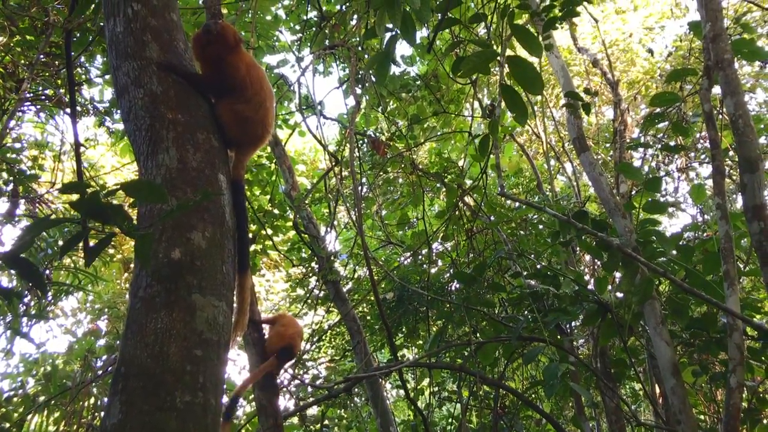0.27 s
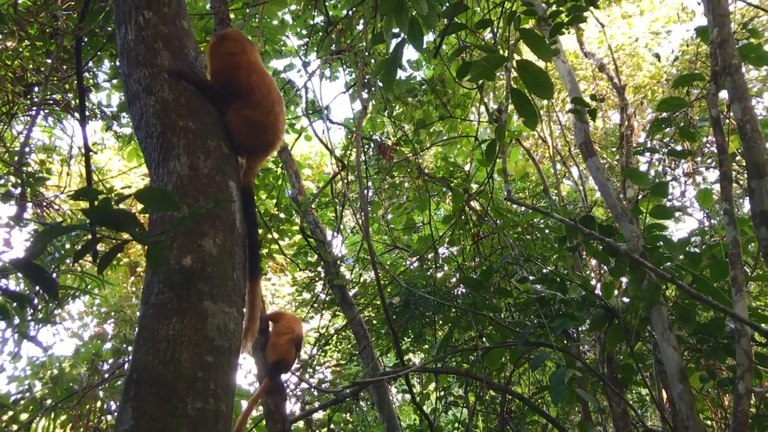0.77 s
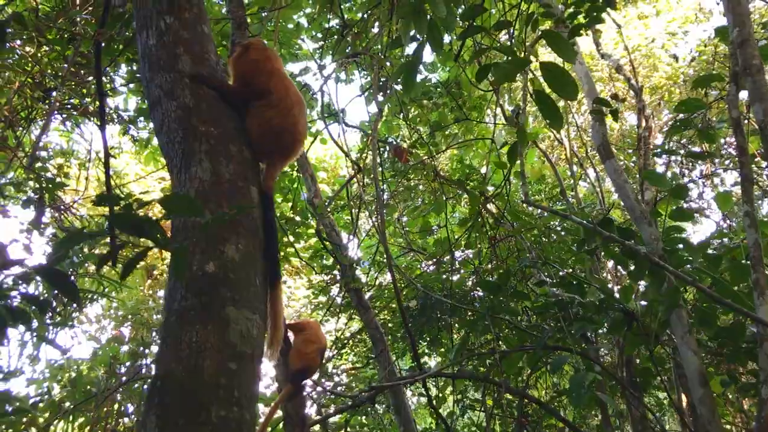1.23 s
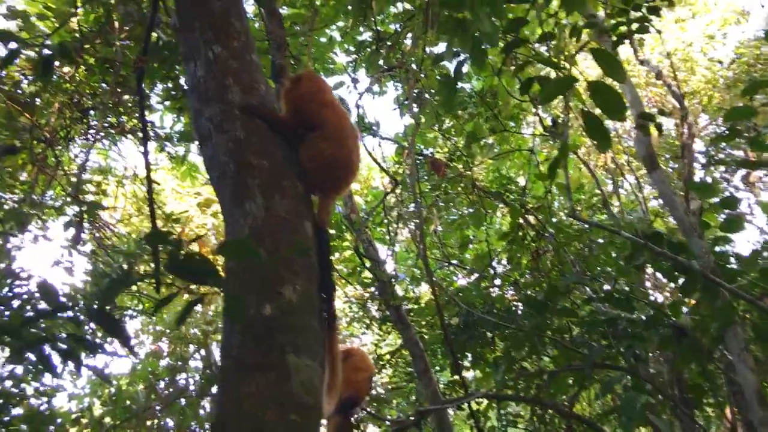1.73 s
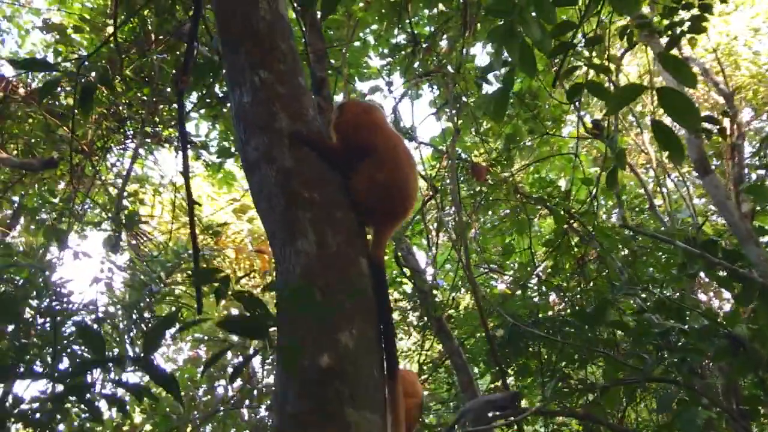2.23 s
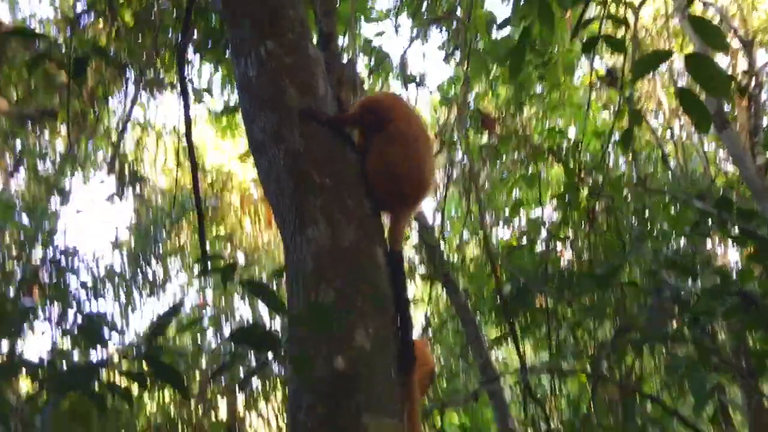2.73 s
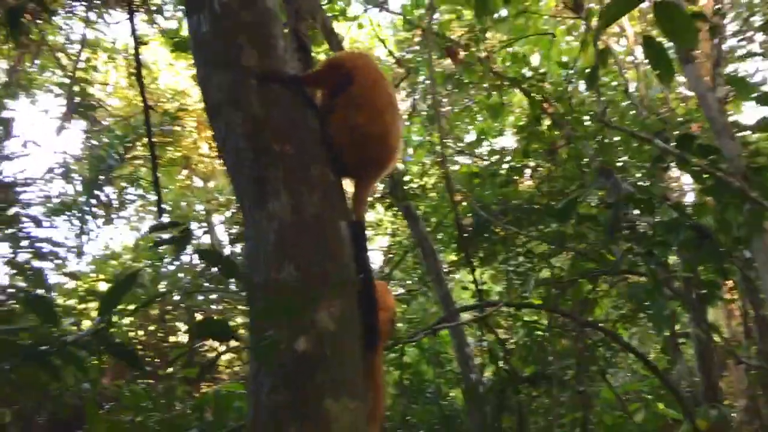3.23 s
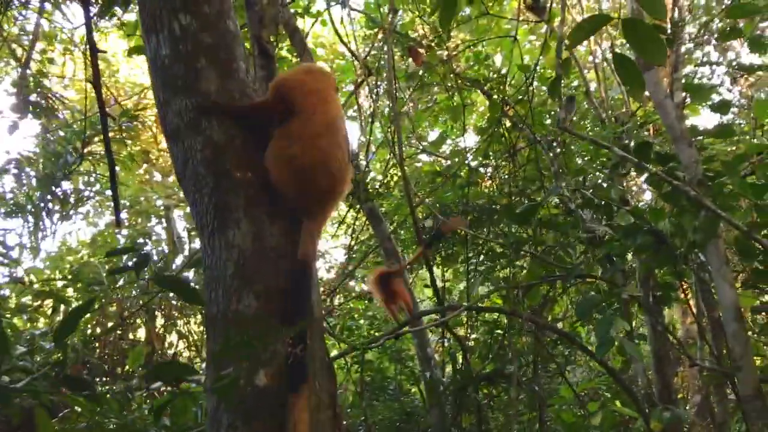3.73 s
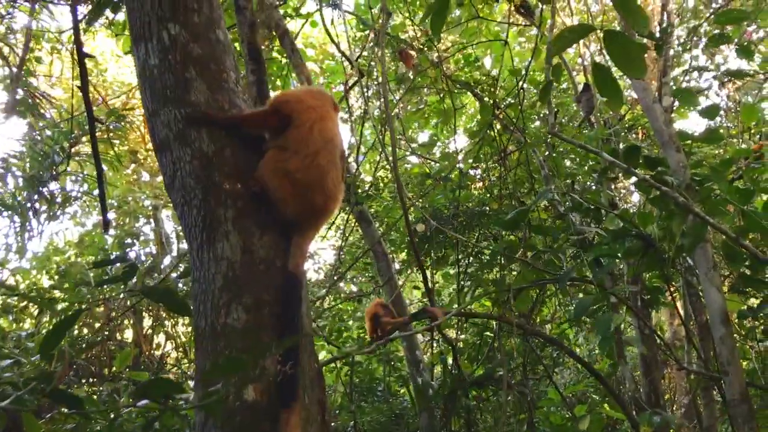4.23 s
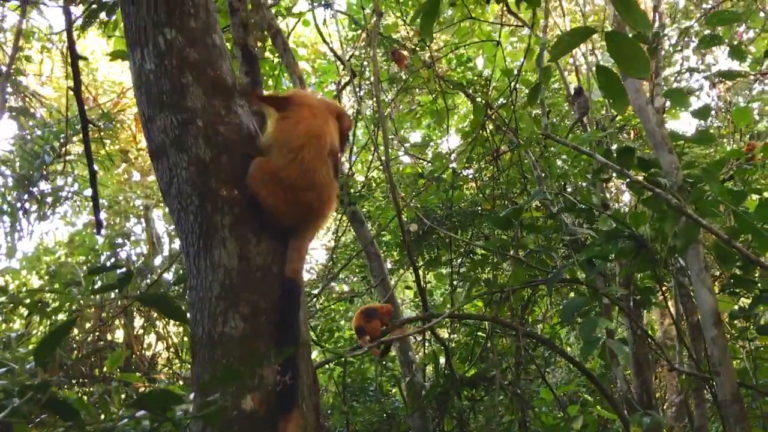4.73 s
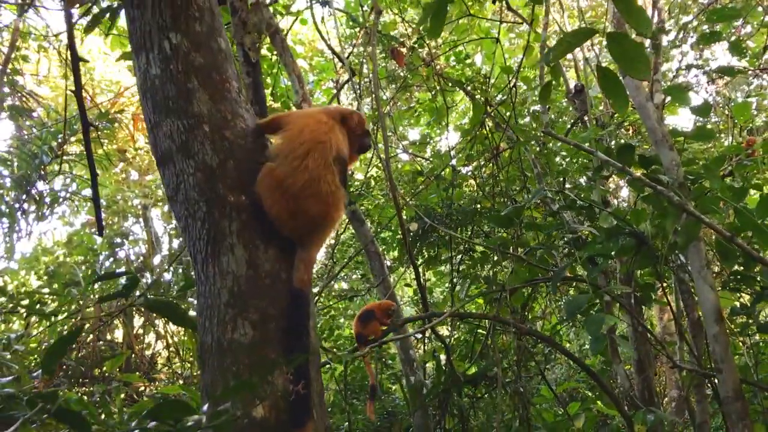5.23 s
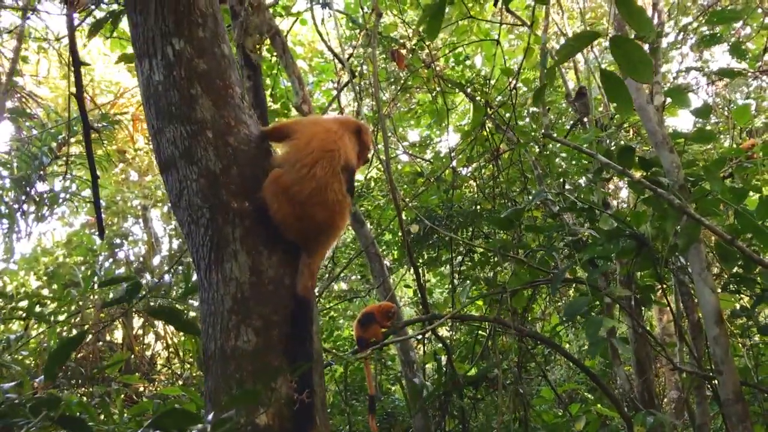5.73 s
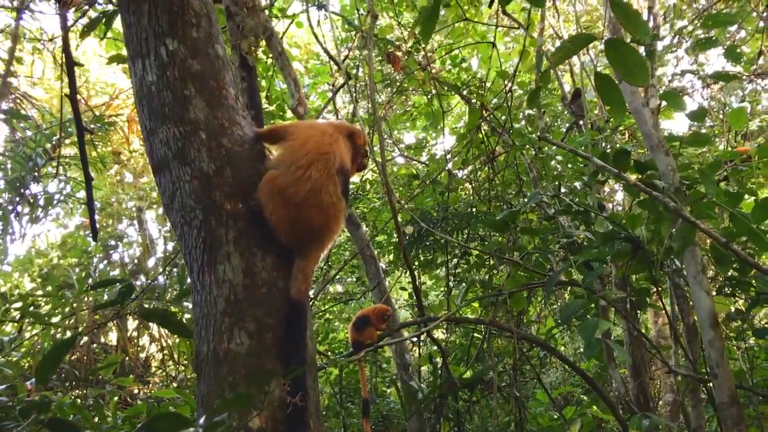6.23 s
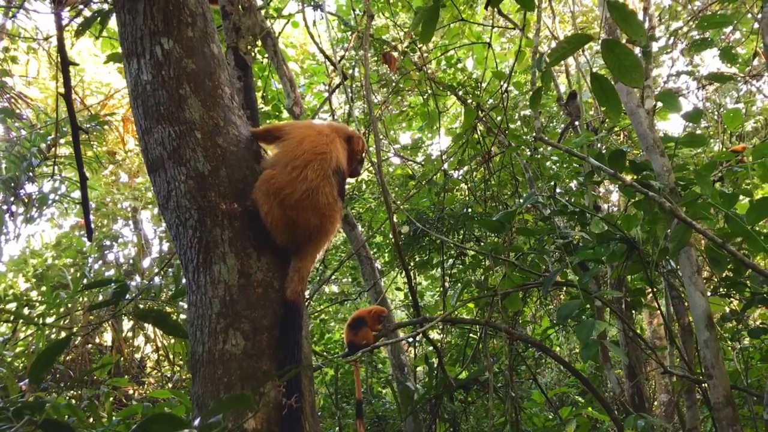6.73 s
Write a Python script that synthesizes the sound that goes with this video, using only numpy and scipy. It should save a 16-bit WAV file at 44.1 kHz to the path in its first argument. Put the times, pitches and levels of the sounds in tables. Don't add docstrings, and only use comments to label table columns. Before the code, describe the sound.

Outdoors in dense forest, a hand-held microphone a few metres from small monkeys. A distant harsh scream fades, then a quick bright trill and thin sagging whistles. Around two seconds chirps lead into two torn, piercing screams, answered by a farther rough scream. A quiet stretch follows with small twig snaps, then a run of clear high whistles. Leaf and insect hiss, a faint drone and light wind rumble lie underneath.

```python
import sys
import numpy as np
from scipy import signal
from scipy.fft import rfft, irfft, next_fast_len
from scipy.io import wavfile
from scipy.ndimage import uniform_filter1d, minimum_filter1d

SR = 44100
rng = np.random.default_rng(int(sys.argv[2]) if len(sys.argv) > 2 else 0)


def linear_from_db(decibels):
    return 10 ** (np.asarray(decibels, float) / 20)


def put_to_file(sound):
    columns = np.atleast_2d(sound).T
    safe = np.clip(columns, -1, 1)
    whole_steps = np.round(safe * 32767)
    wavfile.write(sys.argv[1], SR, whole_steps.astype(np.int16))


N = 307801

# (start [s], length [s], first pitch [Hz], last pitch [Hz], level [dB])
LEAD_IN = (.246, .05, 10200, 8250, -33)
STEADY_DB = 2.04


def level(x, db):
    return x * linear_from_db(db) / np.sqrt(np.mean(x ** 2))


def shaped(x, table):
    hz, db = np.transpose(table)
    size = next_fast_len(x.shape[-1])
    f = np.maximum(np.arange(size // 2 + 1) * SR / size, 1)
    gain = linear_from_db(np.interp(np.log(f), np.log(hz), db))
    return irfft(rfft(x, size) * gain, size)[..., :x.shape[-1]]


def band(hz, width, db=0):
    return [(max(hz - 3 * width, 5), db - 50), (max(hz - width / 2, 6), db - 0.5), (hz, db),
            (hz + width / 2, db - 1), (hz + 3 * width, db - 64.0)]


def walk(rate, size=N):
    k = max(int(SR / rate), 1)
    noise = rng.standard_normal(size + 2 * k)
    smooth = uniform_filter1d(uniform_filter1d(noise, k), k)[k:k + size]
    return smooth * np.sqrt(1.5 * k)


def add(out, x, start, pan_db):
    i = int(start * SR)
    x = x[:N - i]
    out[:, i:i + len(x)] += x * linear_from_db(np.array([[pan_db], [-pan_db]]) / 2)


def glide(row, bend, attack_s, onset_db, fade_db, chaos):
    s, length, first_hz, last_hz, db = row
    u = np.linspace(0, 1, 24)
    slide = u ** bend if bend > 1 else 1 - (1 - u) ** (1 / bend)
    pitch_hz = first_hz + (last_hz - first_hz) * slide
    level_db = db + onset_db * np.clip(1 - u * length / attack_s, 0, 1) + fade_db * (u - .5)
    return np.transpose([s + u * length, pitch_hz, level_db, chaos + 0 * u])


def voice(rows, overtone_db, spread=.16, tear_hz=1500, wobble=0.00641, flutter_db=3.5, rasp_db=4.5, throat=None):
    # (frequency [Hz], level [dB per Hz])
    rasp_colour = [(530, -73), (900, -43), (1470, -26.5), (1880, -26), (2220, -23), (3300, -25.5),
                   (4410, -24.5), (6330, -5.5), (7860, -1), (10500, -2.5), (12400, -13.5), (14900, -1.5),
                   (16000, -21)]
    # (frequency [Hz], gain [dB])
    short_throat = [(1000, -45), (3400, -26), (4200, -7), (5200, -1.5), (16000, -0.5)]
    s, *columns = np.transpose(rows)
    t = np.arange(s[0], s[-1], 1 / SR)
    hz, db, chaos = (uniform_filter1d(np.interp(t, s, c), size=160, mode="nearest") for c in columns)
    chaos = np.clip(chaos, 0, 1)
    shake = spread * chaos * walk(tear_hz, len(t)) + wobble * walk(145, len(t))
    hz = hz * np.clip(1 + shake, .6, 1.35)
    phase = 2 * np.pi * np.cumsum(hz) / SR
    audible = np.clip((SR / 2 - 2 * hz) / 2000, 0, 1)
    tone = np.sqrt(2) * (np.sin(phase) + linear_from_db(overtone_db) * audible * np.sin(2 * phase))
    tone = tone * linear_from_db(flutter_db * walk(166, len(t)) + 1.6 * chaos * walk(1300, len(t)))
    rasp = level(shaped(rng.standard_normal(len(t)), rasp_colour), rasp_db)
    rasp = rasp * linear_from_db(0.22 * walk(600, len(t)))
    edge = np.clip(np.minimum(t - s[0], s[-1] - t) / 0.001, 0, 1)
    sung = np.sqrt(1 - 0.71 * chaos) * shaped(tone, throat or short_throat)
    return edge * linear_from_db(db) * (sung + chaos ** 2 * rasp)


def trees(x, direct_db, t60, wet_db, late_t60, late_db, alike=0.67):
    t = np.arange(SR * 3 // 4) / SR
    quick = linear_from_db(wet_db - 60 * t / t60) / np.sqrt(t60)
    late = linear_from_db(late_db - 60 * t / late_t60) / np.sqrt(late_t60)
    tail = (quick + late) * np.clip(t / 0.0017, 0, 1) * np.sqrt(np.log(1e6) / SR)
    both, each = rng.standard_normal(len(t)), rng.standard_normal((2, len(t)))
    scatter = np.sqrt(alike) * both + np.sqrt(1 - alike) * each
    echo = shaped(scatter * tail, [(1500, -8), (4500, 0), (9000, 0), (16000, 2)])
    return linear_from_db(direct_db) * x + signal.oaconvolve(x, echo, axes=1)[:, :N]


def far_monkeys():
    # (time [s], pitch [Hz], level [dB], chaos [0-1])
    screams = [
        [(0, 6750, -40, 0.86), (.06, 6660, -41, 0.62), (.13, 6740, -50.5, 0.25), (.20, 6270, -60, 0.3),
         (.25, 6140, -51, .09)],
        [(3.50, 6550, -43.5, 0.87), (3.62, 6670, -48, .83), (3.73, 6580, -46, 0.76), (3.82, 6750, -43.5, 1),
         (3.98, 6930, -42, .82), (4.08, 6680, -44, 0.81), (4.125, 6200, -41.5, 0.262), (4.19, 6150, -52, .7),
         (4.32, 6080, -89, 0.91)],
    ]
    # (start [s], length [s], first pitch [Hz], last pitch [Hz], level [dB])
    sweeps = [
        (4.63, .13, 10500, 11600, -69.5),
        (5.27, .37, 5100, 7900, -67),
        (5.26, .34, 10100, 15000, -65),
    ]
    far = np.zeros((2, N))
    for row in sweeps:
        rows = glide(row, bend=0.7, attack_s=0.018, onset_db=3, fade_db=0, chaos=0.363)
        add(far, voice(rows, overtone_db=-29), row[0], pan_db=4.5)
    for rows in screams:
        add(far, voice(rows, overtone_db=-2), rows[0][0], pan_db=0.4)
    far = shaped(far, [(1000, 2.0), (4000, 3), (6000, -0.5), (13500, -3.0), (14600, -18), (15800, -28)])
    return trees(far, direct_db=-5.5, t60=0.35, wet_db=-4.0, late_t60=0.7, late_db=-11, alike=0.2)


def pair(table, db):
    # (frequency [Hz], side minus mid [dB])
    side_colour = [(60, 6), (110, -12.5), (200, -1.5), (380, -3.5), (700, -5.5), (1290, -5.5), (2380, -2.5),
                   (4400, -3), (8120, -1.5), (15000, 1)]
    mid, side = shaped(rng.standard_normal((2, N)), table)
    side = shaped(side, side_colour)
    return np.array([mid + side, mid - side]) * linear_from_db(db) / np.std(mid)


def forest():
    # (frequency [Hz], level [dB per Hz])
    wind_colour = [(11, -39), (18, 5), (50, -6), (67, -8.5), (130, -25.5), (151, -24.5), (210, -19),
                   (247, -23.5), (301, -22.5), (483, -29.5), (900, -35), (1170, -51.5), (1980, -120)]
    # (time [s], level [dB])
    gusts = [(0, 3), (2.2, 1), (2.45, -5.5), (3.2, 0.5), (4.7, 1.4), (6.1, -0.5), (6.39, 1), (6.42, 8),
             (6.46, -2), (6.98, 0.5)]
    # (frequency [Hz], level [dB per Hz])
    leaf_colour = [(530, -7.5), (900, -10.5), (1000, -3), (1260, -4.5), (1540, -7), (2650, -10),
                   (3290, -10), (4230, -11), (5060, 1), (6830, -9.5), (15800, -16.5)]
    # (frequency [Hz], width [Hz], level [dB])
    drone_modes = [(210, 16, -3), (300.5, 16.4, -8)]
    # (time [s], nearness [0-1])
    passing = [(0, 0.3), (2.4, 0.14), (2.85, 0.95), (3.4, 0.73), (3.8, 0.93), (4.4, 0.58), (4.9, 0.19),
               (6.98, 0.32)]
    t = np.arange(N) / SR
    nearness = np.interp(t, *np.transpose(passing))

    wind = pair(wind_colour, -51.5)
    rumble = shaped(wind, [(110, 0.5), (200, -13)])
    gust = linear_from_db(np.interp(t, *np.transpose(gusts)))
    lean = linear_from_db(np.array([[2.5], [-2.5]]))
    wind = wind + rumble * (gust * lean - 1)

    leaves = pair(leaf_colour, -66) * linear_from_db(6 * (nearness - 0.56) + .5 * walk(21))

    drone = sum(shaped(rng.standard_normal(N), band(*mode)) for mode in drone_modes)
    drone_db, drone_range_db = -51.5, 23
    drone = level(drone, -11.5) * linear_from_db(drone_db + drone_range_db * (nearness - 1))
    return wind + leaves + drone * linear_from_db(np.array([[-1.5], [1.5]]))


def trill(chaos=0.035):
    # (top time [s], top pitch [Hz], bottom pitch [Hz], level of the flick and at the start of the fall
    # [dB], level the fall settles to near its bottom [dB])
    strokes = [
        (0.308, 14020, 6590, -29, -30.5),
        (.351, 8450, 5510, -30.5, -27),
        (.397, 9670, 5170, -29, -32),
        (.444, 6380, 5126, -34, -27.5),
    ]
    flick_s, top_s, fall_s = .013, 0.0035, .03
    rows = [glide(LEAD_IN, bend=.33, attack_s=0.017, onset_db=-11, fade_db=5.0, chaos=chaos)]
    for s, top_hz, bottom_hz, top_db, bottom_db in strokes:
        last_hz = rows[-1][-1, 1]
        flick = (s - flick_s, flick_s, last_hz, top_hz, top_db)
        fall = (s + top_s, fall_s, top_hz, bottom_hz, bottom_db)
        rows += [glide(flick, bend=.9, attack_s=flick_s, onset_db=-3.5, fade_db=-4, chaos=chaos),
                 glide(fall, bend=0.65, attack_s=0.023, onset_db=top_db - bottom_db, fade_db=0, chaos=chaos)]
    rows = np.vstack(rows)
    rows[:, 0] = np.maximum.accumulate(rows[:, 0])
    return rows


def near_monkeys():
    # (start [s], length [s], first pitch [Hz], last pitch [Hz], level [dB])
    hooks = [(2.084, 0.02, 7500, 9700, -46.5), (2.108, 0.047, 7900, 6170, -35.5),
             (2.152, .044, 6200, 6810, -42), (2.197, .028, 6870, 5810, -32), (2.485, .022, 6490, 5520, -41),
             (2.772, 0.016, 6010, 4050, -38.5), (3.628, .03, 9100, 7000, -40),
             (3.662, .05, 6520, 5630, -45), (6.825, 0.04, 9800, 7100, -65),
             (6.878, .044, 11000, 6950, -58.5), (6.924, .022, 5270, 4060, -56),
             (0.476, .014, 5250, 4450, -48)]
    dives = [
        (2.662, 0.044, 7230, 4310, -33),
        (3.428, .05, 6970, 4500, -30.5),
    ]
    whines = [
        (2.50, .25, 9530, 8900, -41.5),
        (4.13, 0.19, 6930, 6890, -54.5),
    ]
    squeals = [
        (2.272, 0.27, 7250, 7600, -54),
        (2.928, 0.032, 4340, 6020, -48),
        (3.101, .33, 7600, 7440, -47),
    ]
    croaks = [
        (6.385, .11, 1800, 3500, -57),
        (6.915, .065, 1360, 3270, -58.5),
        (2.225, 0.039, 1600, 3600, -57.5),
    ]
    # (time [s], pitch [Hz], level [dB], chaos [0-1])
    screams = [
        [(2.208, 4770, -41.5, 0.03), (2.225, 5120, -37, 0.01), (2.250, 6100, -30, 0.32),
         (2.275, 6200, -31.5, 0.62), (2.31, 6870, -36, 0.92), (2.36, 7900, -38, 0.99), (2.50, 7960, -35, 0.61),
         (2.62, 7440, -37, 0.76), (2.67, 6660, -37.5, .42)],
        [(2.74, 6620, -52, 0.85), (2.85, 6370, -49.5, 0.94), (2.93, 6050, -41, 0.18), (2.97, 6230, -35, 0.62),
         (3.06, 6960, -37, 0.89), (3.16, 7480, -32.5, 0.8), (3.30, 7420, -34, 0.86), (3.40, 7390, -36, 0.81),
         (3.44, 7030, -32.5, .8)],
    ]
    near = np.zeros((2, N))
    add(near, voice(trill(), overtone_db=-7.0, flutter_db=STEADY_DB), LEAD_IN[0], pan_db=2.0)
    for row in hooks:
        rows = glide(row, bend=.7, attack_s=.01, onset_db=-2.5, fade_db=2, chaos=0.016)
        add(near, voice(rows, overtone_db=-12, flutter_db=STEADY_DB), row[0], pan_db=3.5)
    for row in dives:
        rows = glide(row, bend=2.5, attack_s=.02, onset_db=-19, fade_db=-11, chaos=.01)
        add(near, voice(rows, overtone_db=-2.5, flutter_db=STEADY_DB), row[0], pan_db=1.0)
    for row in whines:
        rows = glide(row, bend=.8, attack_s=0.026, onset_db=-11, fade_db=-7, chaos=0.199)
        add(near, voice(rows, overtone_db=-31), row[0], pan_db=-1.0)
    for row in squeals:
        rows = glide(row, bend=0.74, attack_s=.02, onset_db=1, fade_db=3.0, chaos=0.183)
        add(near, voice(rows, overtone_db=9), row[0], pan_db=3.1)
    for rows in screams:
        add(near, voice(rows, overtone_db=-6), rows[0][0], pan_db=3.1)
    open_throat = [(600, 14), (2000, 0.5), (3600, 4.0), (6000, -17)]
    for row in croaks:
        rows = glide(row, bend=1.2, attack_s=0.061, onset_db=-11, fade_db=-3.5, chaos=0.593)
        croak = voice(rows, overtone_db=-8, spread=0.29, rasp_db=-44, throat=open_throat)
        add(near, croak, row[0], pan_db=.3)
    return trees(near, direct_db=-3.5, t60=0.21, wet_db=-4, late_t60=0.58, late_db=-6.5, alike=0.18)


def whistlers():
    # (start [s], length [s], first pitch [Hz], last pitch [Hz], level [dB])
    whistles = [(.65, 0.14, 6730, 6550, -51.5), (0.773, .19, 7250, 7140, -47), (.975, 0.1, 7330, 7150, -55),
                (1.03, 0.2, 6910, 6570, -58), (1.26, .09, 6650, 6200, -56.5),
                (1.725, 0.131, 6680, 6290, -56), (2.055, 0.041, 6640, 6650, -50.5),
                (5.09, 0.12, 6600, 6360, -60), (5.785, .115, 6530, 6540, -44.5),
                (5.90, 0.21, 6530, 6490, -51), (6.095, 0.16, 6960, 6660, -49), (6.25, .15, 7000, 6700, -48),
                (6.405, .165, 7000, 6886, -46), (6.574, 0.14, 6970, 6810, -46.5),
                (6.734, 0.17, 7160, 6834, -45.5), (6.925, 0.068, 7220, 7220, -41.5)]
    # (start [s], length [s], first pitch [Hz], last pitch [Hz], level [dB])
    scoops = [
        (1.235, .06, 5750, 6430, -62),
        (1.72, .05, 6020, 6420, -59),
        (5.76, .045, 5850, 6430, -57.5),
    ]
    out = np.zeros((2, N))
    for row in whistles:
        softer = np.add(row, (0, 0, 1, 0, -6))
        rows = glide(softer, bend=0.608, attack_s=.015, onset_db=-13.5, fade_db=-14, chaos=0)
        add(out, voice(rows, overtone_db=-22.0, wobble=0.01187, flutter_db=3.5), row[0], pan_db=.4)
    for row in scoops:
        rows = glide(row, bend=.55, attack_s=.012, onset_db=-7, fade_db=0.0, chaos=.12)
        add(out, voice(rows, overtone_db=-22, wobble=0.0244, flutter_db=6.0), row[0], pan_db=.4)
    return trees(out, direct_db=-4.0, t60=0.19, wet_db=-1.0, late_t60=0.45, late_db=-4.5, alike=0.26)


def twigs():
    # (time [s], peak level [dB], centre [Hz], width [Hz], left minus right [dB])
    snaps = [(.835, -66, 2050, 1470, 9), (1.109, -66, 3520, 2500, 2), (1.281, -57.5, 3030, 3000, 1),
             (1.674, -57, 3300, 3000, 15), (1.676, -60, 8900, 6000, 5), (4.636, -59, 5040, 5000, -3),
             (4.755, -58.5, 5060, 6000, 0), (5.273, -50.5, 11900, 2500, -8), (5.480, -49, 11100, 6500, -7),
             (5.490, -67, 14000, 2000, 3), (6.310, -62.5, 2700, 1200, -11), (6.518, -59, 1200, 990, 0),
             (6.519, -61, 10600, 1500, 0), (6.565, -55.5, 1960, 1200, -8), (6.567, -58, 9600, 1500, 0),
             (6.710, -58.5, 2950, 1200, 14)]
    # (time [s], peak level [dB], centre [Hz], width [Hz], left minus right [dB])
    rustles = [
        (.984, -63, 10800, 3020, -5),
        (1.119, -66, 11200, 3000, -1),
        (1.27, -59, 10900, 3550, 1),
        (5.262, -64, 3900, 1200, -8),
        (5.257, -59, 10200, 3000, -13),
        (5.736, -64, 10000, 4000, 1),
    ]
    out = np.zeros((2, N))
    t = np.arange(SR // 5) / SR
    for rows, t60 in ((snaps, 0.017), (rustles, 0.11)):
        for s, db, hz, width, pan_db in rows:
            burst = rng.standard_normal(len(t)) * linear_from_db(-60 * t / t60)
            crack = shaped(burst, band(hz, width))
            add(out, linear_from_db(db) * crack / np.abs(crack).max(), s, pan_db)
    return trees(out, direct_db=5.0, t60=0.42, wet_db=4, late_t60=0.22, late_db=-2)


def scene():
    return far_monkeys() + forest() + near_monkeys() + whistlers() + twigs()


def masked(x, near_db=-28, top_db=-25.5, top_hz=14200, count=95):
    f, _, z = signal.stft(x, SR, nperseg=2048)
    power = np.mean(np.abs(z) ** 2, axis=0)
    bands = uniform_filter1d(power, size=17, axis=0)
    calls = bands * (f[:, None] > 4000)
    below = -minimum_filter1d(-calls, size=count, axis=0, origin=(count - 1) // 2)
    loudest = np.max(bands[f > 4000], axis=0)
    hidden_near = bands < below * linear_from_db(2 * near_db)
    hidden_top = (f[:, None] > top_hz) & (bands < loudest * linear_from_db(2 * top_db))
    return signal.istft(z * ~(hidden_near | hidden_top), SR, nperseg=2048)[1][:, :N]


def top_cut(x):
    return signal.sosfilt(signal.butter(12, 16460, fs=SR, output="sos"), x)


def record(dry):
    low_pass = signal.ellip(10, .2, 80, 15800, fs=SR, output="sos")
    finished = masked(signal.sosfilt(low_pass, dry))
    return top_cut(finished)


dry = scene()
out = record(dry)
put_to_file(out)
```